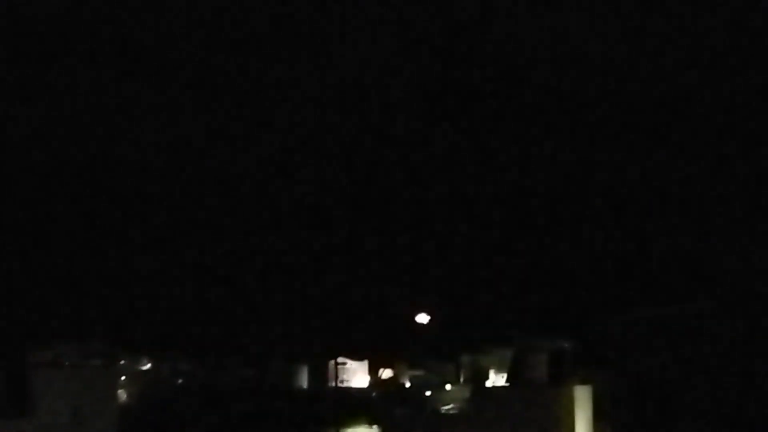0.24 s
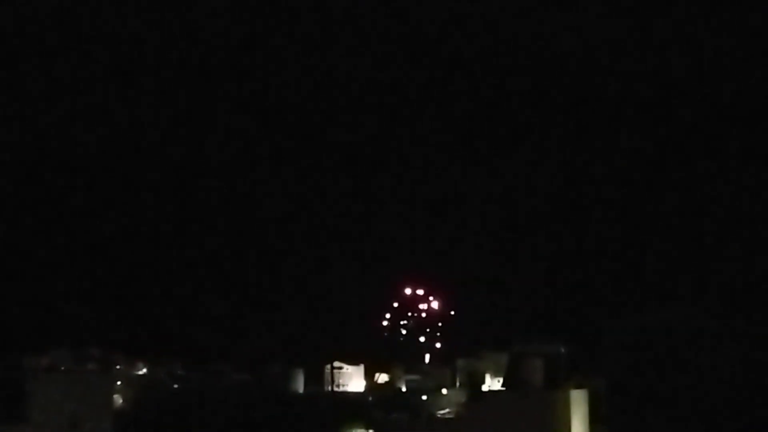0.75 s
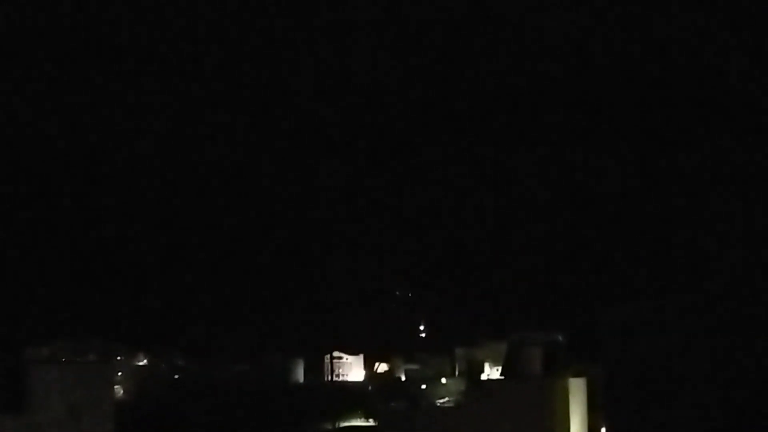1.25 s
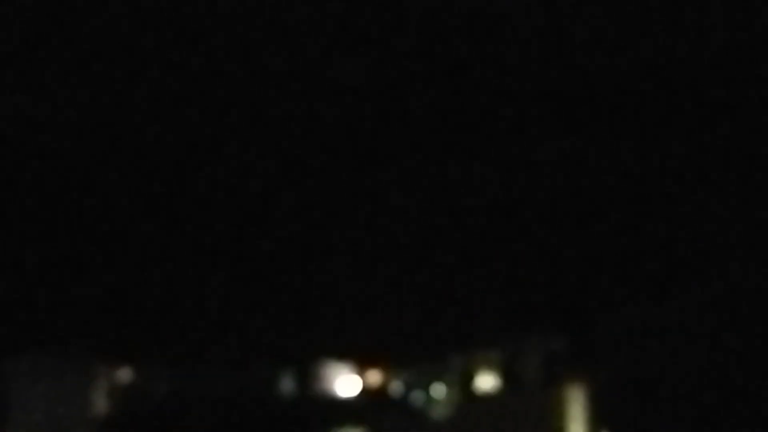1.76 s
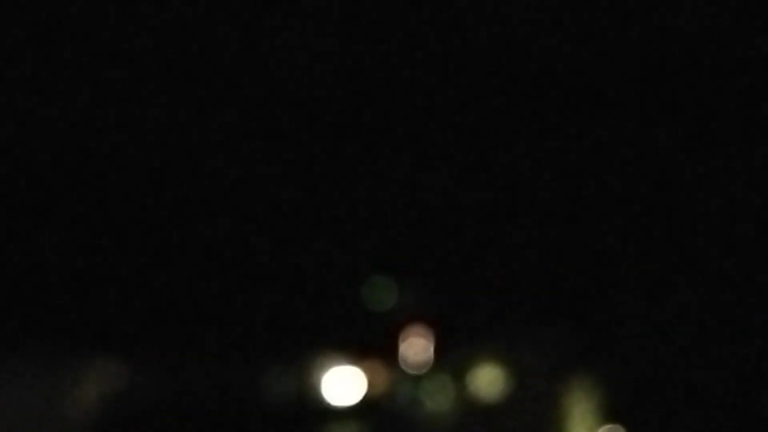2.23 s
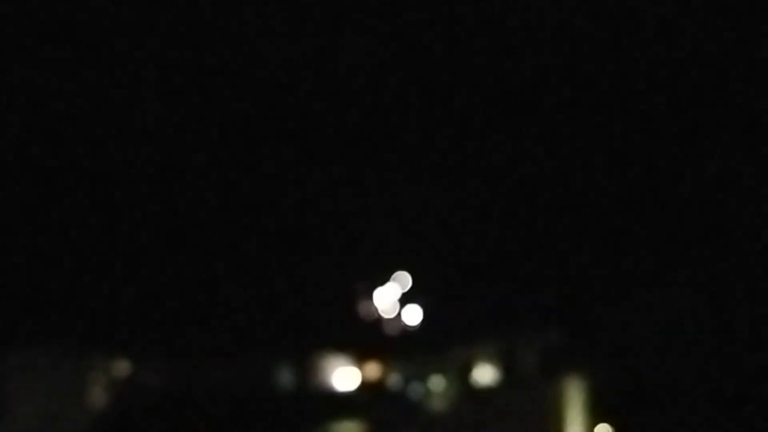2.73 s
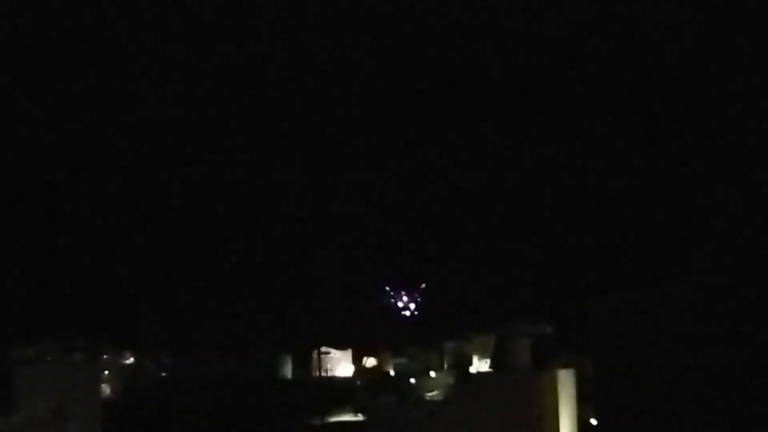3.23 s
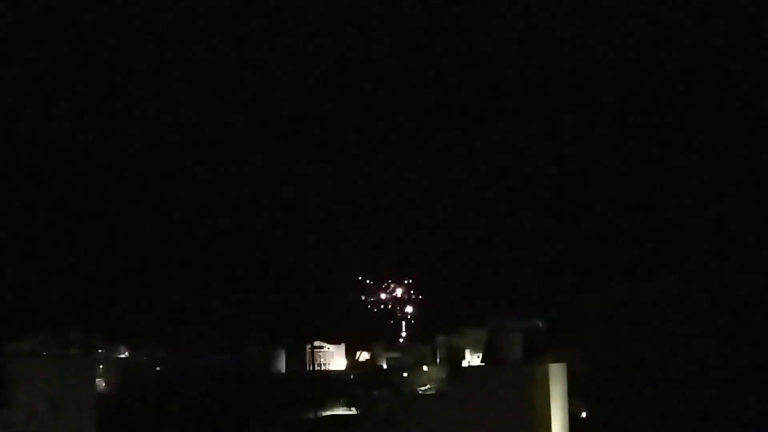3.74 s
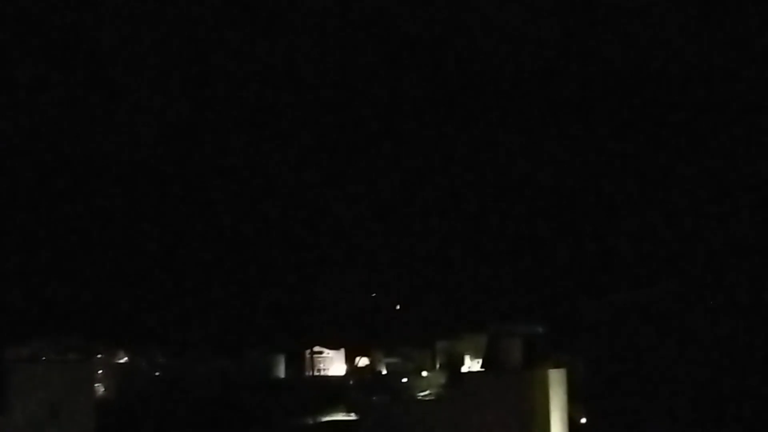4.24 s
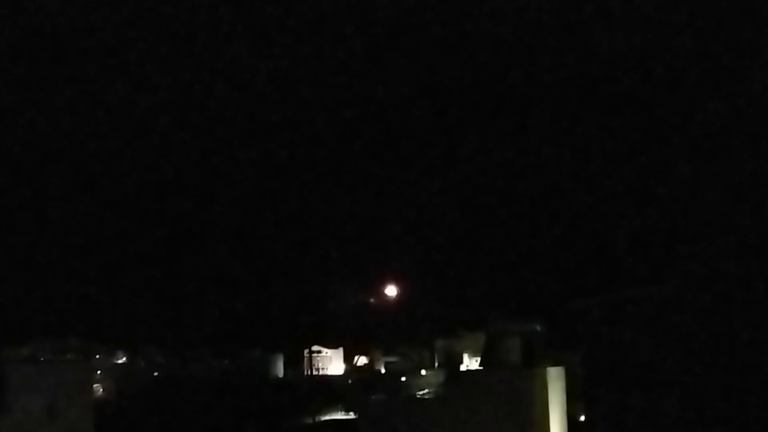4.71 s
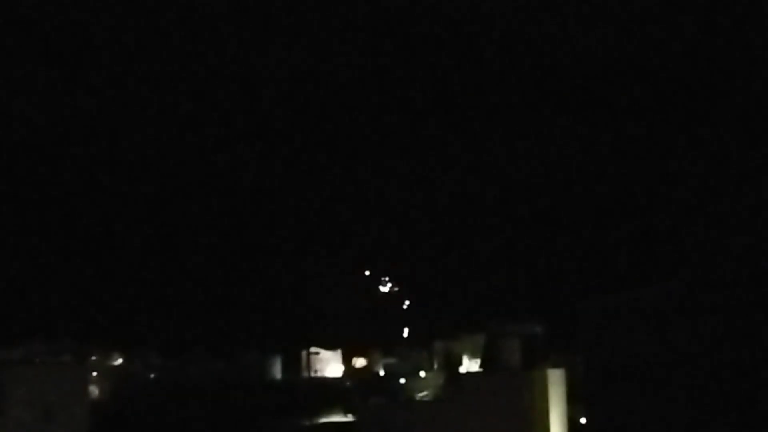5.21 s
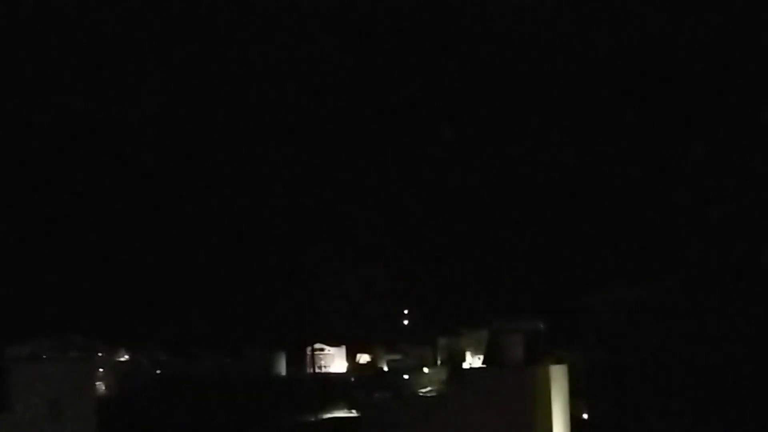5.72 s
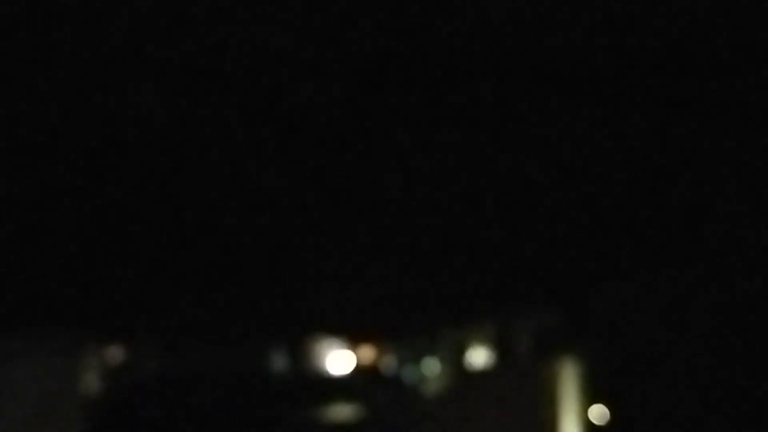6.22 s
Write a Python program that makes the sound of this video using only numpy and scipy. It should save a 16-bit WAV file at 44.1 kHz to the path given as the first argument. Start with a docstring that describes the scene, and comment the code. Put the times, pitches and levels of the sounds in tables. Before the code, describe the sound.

A town at night, heard in stereo from a distant balcony over a faint steady low background with slight hiss. From 0.15 to 1.4 s, small dry firework pops tick irregularly, a few sharper near 1.0 and 1.3 s, with very faint far thuds. At 1.7 s a hard bang cracks, slaps off close walls and rolls back from buildings with a brief falling bass whoop. Crackling stars thicken around 2.35-2.6 s, then thin out. A second bang at 3.3 s is followed by the loudest, densest crackle, 3.8-4.3 s. A duller, weaker bang at 4.4 s rumbles away; crisp crackles swell around 5.0-5.3 s, with stray snaps until 6.1 s. At 6.16 s the strongest bang hits, softly overloading the microphone, with close echoes, a short bright sizzle at 6.3 s and a rough rolling tail.

```python
"""Four firework shells burst over a town at night, heard in stereo from a distant balcony.
Each blast is a push, a suck and a rear shock; it slaps off near walls and rolls back from the buildings.
Stars pop singly as tiny N-shaped shocks, and three crackling swarms are random double clicks.
Filtered noise gives the far thuds, a bright sizzle and a steady background; falling sines give whoops."""
import sys
import numpy as np
from scipy import signal
from scipy.fft import rfft, irfft, next_fast_len
from scipy.io import wavfile
from scipy.ndimage import uniform_filter1d

SR = 44100
rng = np.random.default_rng(int(sys.argv[2]) if len(sys.argv) > 2 else 0)


def to_wav(s):
    """Save 16-bit WAV."""
    ch = np.atleast_2d(s).T  # columns
    pcm = np.round(np.clip(ch, -1, 1) * 32767)  # PCM
    wavfile.write(sys.argv[1], SR, pcm.astype(np.int16))


N = 284886
SIZE = next_fast_len(N + SR)
HZ = np.maximum(np.fft.rfftfreq(SIZE, 1 / SR), 1e-3)
TIME = np.arange(N) / SR

# Shell bursts: start_s, level_db, push_ms, rear_shock_lag_ms, rear_shock_strength, rounding_hz,
# front_snap_strength, splinter_db and roll_db (own levels), roll_tilt_db_per_octave
SHELLS = [(1.6754, 0.1, 0.46, 2.52, 0.39, 1570, 1.6, -21.5, -37.5, 1.5),
          (3.2688, -1.5, 0.86, 1.05, 0.22, 2670, 0.51, -17, -35, 0.2),
          (4.3838, -5.5, 1.7, 1.21, 1, 1710, 3.1, -19.5, -35, 0.2),
          (6.1578, 4, 0.33, 0.96, 0.21, 3130, 2.1, -37, -32.5, 0.7)]
# Strong echoes from large far facades: start_s, level_db, crack_db (relative to level_db)
FACADE_RETURNS = [(1.722, -40, -21), (1.784, -45, -23), (1.805, -59, -21), (1.83, -48, -21),
                  (1.914, -44, -6), (1.986, -43.5, -13), (2.051, -49.5, -5), (3.292, -32, -12),
                  (3.316, -46, 7), (3.392, -39, -3), (3.43, -47, -19), (3.469, -46.5, -18),
                  (3.493, -45, -18), (3.529, -43, -1), (3.587, -39.5, -27), (3.597, -50, -29),
                  (3.652, -46.5, -13), (4.407, -32.5, -13), (4.51, -34.5, -25), (4.529, -44, -23),
                  (4.547, -42, -20), (4.612, -43.5, -13), (4.645, -45.5, -7), (4.683, -38.5, -15),
                  (4.759, -43, -22), (4.812, -49.5, -9), (6.2, -53, -24), (6.263, -38, -14),
                  (6.28, -35.5, -6), (6.287, -56, -12), (6.32, -36, -30), (6.403, -42, -18),
                  (6.453, -39, -16)]
# Single star pops, loud and faint: start_s, level_db, shock_length_ms, rounding_hz
STAR_POPS = [(0.1502, -42.5, 0.62, 3500), (0.1707, -36.5, 0.58, 5300.0), (0.2601, -29, 0.46, 2040),
             (0.4278, -33, 0.11, 4100.0), (0.4642, -26, 0.11, 3600.0), (0.4886, -39, 0.23, 5350),
             (0.4952, -45, 0.27, 5000), (0.5533, -29, 0.11, 2700.0), (0.5625, -38, 0.27, 6100.0),
             (0.5903, -45, 0.2, 7000.0), (0.6463, -24, 0.17, 1400.0), (0.666, -30.5, 0.2, 6100.0),
             (0.71, -37, 0.21, 3600.0), (0.7158, -39, 0.4, 4000), (0.7218, -42, 0.38, 2700.0),
             (0.7257, -40, 0.25, 4000), (0.738, -37, 0.28, 3500), (0.754, -41, 0.25, 4000),
             (0.6755, -38, 0.35, 4000), (0.782, -38.5, 0.41, 3100.0), (0.832, -35, 0.32, 2700),
             (0.8517, -36, 0.44, 4700.0), (0.964, -38.5, 0.7, 5500), (0.992, -15.5, 0.11, 1800.0),
             (1.0156, -34, 0.33, 7000.0), (1.1588, -26, 0.15, 2700.0), (1.1873, -35.5, 0.38, 5300.0),
             (1.2875, -22.5, 0.19, 2850), (1.4262, -31, 0.14, 2100.0), (2.2179, -24, 0.13, 2700.0),
             (2.2827, -26, 0.23, 3600.0), (2.3145, -27.5, 0.35, 4100.0), (2.352, -9, 0.12, 2100.0),
             (2.3748, -19, 0.13, 1400.0), (2.418, -27, 0.34, 3600.0), (2.4214, -21, 0.27, 3000),
             (2.4332, -25.5, 0.4, 3200), (2.4472, -12, 0.15, 2380), (2.4539, -24, 0.36, 4500),
             (2.458, -17, 0.21, 2400.0), (2.4767, -36, 0.24, 4500), (2.4986, -30, 0.19, 4500),
             (2.5534, -31, 0.61, 4000), (2.5978, -23, 0.26, 4500), (2.5891, -43, 0.18, 6100.0),
             (2.606, -26, 0.3, 5340), (2.6365, -24.5, 0.31, 7000.0), (2.6542, -23.5, 0.19, 7000.0),
             (2.7884, -26.5, 0.67, 7000.0), (2.9152, -19.5, 0.15, 2520), (3.0981, -33, 0.26, 6100.0),
             (3.8076, -6.5, 0.069, 1610), (3.8656, -10, 0.099, 3100.0), (3.8859, -22, 0.42, 1400.0),
             (3.9045, -21.5, 0.45, 6900), (3.9258, -18.5, 0.36, 7000.0), (3.9429, -17.5, 0.55, 7000.0),
             (3.9518, -8, 0.13, 2400.0), (3.9766, -14.5, 0.19, 5250), (3.987, -17, 0.11, 4500),
             (3.9971, -19, 0.23, 4000), (4.0092, -19, 0.39, 4500), (4.021, -12, 0.18, 5300.0),
             (4.0295, -17.5, 0.31, 5000), (4.0438, -16.5, 0.29, 3600.0), (4.0516, -12, 0.2, 2400.0),
             (4.0568, -17.5, 0.16, 5000), (4.0734, -23, 0.31, 4500), (4.0901, -19, 0.23, 4500),
             (4.1009, -16.5, 0.22, 5300.0), (4.1087, -7.5, 0.17, 2100.0), (4.1401, -18.5, 0.37, 7000.0),
             (4.1742, -21, 0.28, 3960), (4.1807, -15.5, 0.23, 3600.0), (4.2224, -21.5, 0.41, 2720),
             (4.2279, -36, 0.47, 2700), (4.2336, -24.5, 0.33, 3000), (4.267, -19, 0.37, 3580),
             (4.3181, -26.5, 0.39, 4660), (4.9042, -39, 0.27, 4500), (4.9166, -31, 0.3, 4500),
             (4.9458, -18.5, 0.17, 2420), (4.9898, -23.5, 0.24, 4500), (5.0132, -25, 0.48, 4500),
             (5.0349, -9.5, 0.16, 2080), (5.08, -23, 0.3, 4000), (5.0922, -20, 0.33, 4000),
             (5.101, -8.5, 0.18, 2100.0), (5.1143, -23.5, 0.5, 7000.0), (5.1239, -26, 0.33, 3500),
             (5.1682, -6.5, 0.16, 2720), (5.1733, -11, 0.23, 6100.0), (5.1845, -21, 0.28, 4500),
             (5.1919, -26, 0.36, 4000), (5.216, -13.5, 0.25, 5300.0), (5.24, -9.5, 0.17, 2100.0),
             (5.2545, -16.5, 0.33, 2700.0), (5.2732, -19, 0.35, 2700.0), (5.4185, -23, 0.29, 6100.0),
             (5.4779, -31.5, 0.2, 6000), (5.5255, -36, 0.14, 5000), (5.5381, -35, 0.19, 5000),
             (5.5691, -30, 0.27, 5000), (5.5757, -11, 0.12, 2100.0), (5.5999, -19.5, 0.1, 3600.0),
             (5.6394, -10, 0.1, 1620), (5.731, -26, 0.63, 7000.0), (5.8392, -20.5, 0.11, 2400.0),
             (5.8611, -30.5, 0.2, 5340), (5.9569, -38, 0.56, 6960), (6.0617, -20, 0.17, 1800.0)]
# Dull far thuds: start_s, level_db
THUDS = [(0.147, -54), (0.261, -58.5), (1.604, -53)]
# Crackling swarms, thickest about 0.8 s after their bursts: thickest_s, relative_db, swell_s, thinning_s
SWARMS = [(2.499, -40.5, 0.12, 0.099), (4.032, -34.5, 0.11, 0.091), (5.169, -41.5, 0.14, 0.081)]
# Near walls: delay_ms, strength (before the band limits), lowest_hz, highest_hz
NEAR_WALLS = [(5.042, 0.76, 214, 2300), (12.19, 0.96, 210, 300), (15.15, 0.95, 15, 66),
              (25.39, 0.49, 380, 200)]
# Colours of the crackle, roll, splinters and background: frequency_hz, relative_db
CRACKLE_COLOUR = [(400, 2), (700, -1.5), (1000, -1.5), (1500, -1.5), (2300, -2), (3400, -1.5), (5200, -9),
                  (6600, -20), (8200, -34.5), (14000, -57)]
ROLL_COLOUR = [(40, -28.5), (90, -14.5), (150, -8.5), (250, -2.5), (420, 2), (650, -1), (950, -9),
               (1600, -13.5), (3000, -19.5), (5000, -27), (7500, -43), (14000, -59)]
SPLINTER_COLOUR = [(150, -37), (500, -23), (900, -2), (1600, 8), (3200, 3), (5000, -7.5), (7500, -24),
                   (14000, -46)]
BACKGROUND_COLOUR = [(15, -62), (25, -21.5), (91, -8.5), (250, -2.5), (326, -10), (392, -8), (511, -10),
                     (741, -13.5), (824, -9.5), (892, -15.5), (1920, -16.5), (5120, -25), (6850, -33.5),
                     (11000, -39), (14000, -30.5)]
# Diffuse sound at the two ears of the microphone: frequency_hz, likeness (0 unrelated, 1 alike)
LIKENESS = [(40, 0.089), (150, 0.73), (350, 0.87), (700, 0.16), (1500, 0.028), (3500, 0.043),
            (12000, 0.029)]
# The display lies a little to the left: frequency_hz, left_minus_right_db
LEFTWARD = [(200, 1), (600, 0.5), (1300, 3), (2500, 4.5), (8000, 5)]
# Long path through the air, dulling blasts, pops and sizzle: frequency_hz, relative_db
AIR_COLOUR = [(1000, 3), (3300, 5), (5200, 3), (6600, -3), (8200, -16), (10000, -12), (12000, -44),
              (15000, -71)]
# Standing waves between the balcony walls: frequency_hz, width_hz, boost_db
ALCOVE_MODES = [(186.7, 6.4, 5), (256.7, 53, 5.5), (430, 2.5, 3), (620, 86, 4)]


def from_db(db):
    """Amplitude for a level in dB."""
    return 10 ** (np.asarray(db) / 20)


def rms_one(x):
    """Scale to an RMS of 1."""
    return x / np.sqrt(np.mean(x ** 2) + 1e-20)


def at_hz(points):
    """Spread a short spectrum over all frequencies, along a log axis."""
    hz, value = np.transpose(points)
    return np.interp(np.log(HZ), np.log(hz), value)


def delay(ms):
    """Response of a pure delay."""
    return np.exp(-2j * np.pi * HZ * ms / 1000)


def low_pass(hz, order=1):
    """Response of a causal low-pass with one or two poles."""
    u = 1j * HZ / hz
    return 1 / (1 + u) if order == 1 else 1 / (1 + np.sqrt(2) * u + u * u)


def high_pass(hz, order=1):
    """Response of the matching high-pass."""
    return (1j * HZ / hz) ** order * low_pass(hz, order)


def colour(points):
    """Causal (minimum-phase) response with the given spectrum and unit power."""
    magnitude = rms_one(from_db(at_hz(points)))
    cepstrum = irfft(np.log(magnitude), SIZE)
    cepstrum[1:SIZE // 2] *= 2
    cepstrum[SIZE // 2 + 1:] = 0
    return np.exp(rfft(cepstrum))


def filtered(x, response):
    """Pass a signal through a frequency response."""
    return irfft(rfft(x, SIZE) * response, SIZE)[..., :N]


def drift(knots_per_s):
    """Random wandering of RMS 1, straight between its knots."""
    knots = rng.standard_normal(4000)
    return rms_one(np.interp(TIME * knots_per_s, np.arange(len(knots)), knots))


def dying(start_s, t60_s, rise_s=0.0015):
    """Envelope that swells at its start and dies away by 60 dB in t60_s."""
    age = np.maximum(TIME - start_s, 0)
    return (1 - np.exp(-age / rise_s)) * from_db(np.maximum(-60 * age / t60_s, -200))


def bell(centre_s, before_s, after_s):
    """Bell-shaped rise and fall, with its own width on each side."""
    width = np.where(TIME < centre_s, before_s, after_s)
    return np.exp(-.5 * ((TIME - centre_s) / width) ** 2)


def diffuse(envelope, response):
    """A crowd of arrivals from all sides, as noise whose two channels are alike by frequency."""
    mid, side = rfft(rng.standard_normal((2, N)) * envelope, SIZE)
    alike = np.clip(at_hz(LIKENESS), -1, 1)
    both = np.sqrt((1 + alike) / 2) * mid + np.sqrt((1 - alike) / 2) * side * [[1], [-1]]
    return irfft(both * response, SIZE)[:, :N]


def air():
    """Response of the long way through the air, 1 in the bass."""
    response = colour(AIR_COLOUR)
    return response / abs(response[0])


def alcove():
    """Response of the standing waves around the listener: a resonant boost for each mode."""
    modes = [1 + (from_db(db) - 1) / (1 + 1j * (HZ / hz - hz / HZ) * hz / width)
             for hz, width, db in ALCOVE_MODES]
    return np.prod(modes, axis=0)


def background(level_db=-63):
    """Steady background noise, as coloured diffuse noise."""
    return diffuse(from_db(level_db), colour(BACKGROUND_COLOUR))


def rooftops(stars, level_db=-11, t60_s=2.0):
    """The roofs return a faint wash of the stars, convolved with dying diffuse noise."""
    fade = dying(0.0028, t60_s, rise_s=0.0024)
    wash = diffuse(fade / np.linalg.norm(fade), low_pass(8000))
    return filtered(stars, from_db(level_db) * rfft(wash, SIZE))


def roll(t60_s=1.99, far_t60_s=13.8, far_db=-18, thud_t60_s=0.28, thud_tilt_db=-2.5):
    """The town answers each burst with a lumpy, dull cloud of echoes; the far ones linger. Thuds join in."""
    clouds = []
    for start, *_, db, tilt_db in SHELLS:
        near = dying(start, t60_s, rise_s=0.00086)
        far = from_db(far_db) * dying(start, far_t60_s, rise_s=0.47)
        clouds.append((from_db(db) * np.hypot(near, far), tilt_db))
    thuds = sum(from_db(db) * dying(start, thud_t60_s, rise_s=0.0018) for start, db in THUDS)
    clouds.append((thuds, thud_tilt_db))
    # single walls and whole blocks return unequal shares
    facades = rms_one(from_db(2.0 * drift(400) + 1.0 * drift(40)))
    octaves = np.log2(np.clip(HZ, 200, 800) / 400)
    dull = colour(ROLL_COLOUR) * alcove()
    return sum(diffuse(envelope * facades, dull * from_db(tilt_db * octaves))
               for envelope, tilt_db in clouds)


def whoops(late_s=0.115, centre_hz=152, fall_octaves_per_s=15, below_roll_db=-6.5,
           swell_s=0.03, fade_s=0.018):
    """A row of houses echoes at ever wider intervals, merged here into a short, falling bass sine."""
    out = 0
    for start, *_, roll_db, _ in SHELLS:
        centre = start + late_s
        octaves = np.clip(-fall_octaves_per_s * (TIME - centre), -2, 2)
        tone = np.sin(2 * np.pi * np.cumsum(centre_hz * 2 ** octaves) / SR)
        out = out + from_db(roll_db + below_roll_db) * bell(centre, swell_s, fade_s) * tone
    return out


def sizzle(start_s=6.319, level_db=-35, t60_s=.18, low_hz=3000, high_hz=4200):
    """A brief bright hiss in the last echo, as dying band-limited noise."""
    band = high_pass(low_hz, order=2) * low_pass(high_hz, order=2)
    return diffuse(from_db(level_db) * dying(start_s, t60_s), band * air())


def swarm_level(late_s=0.35, stragglers_db=-15.5, spread_s=0.13):
    """Each swarm swells and thins as burn times scatter; slow-burning stragglers follow."""
    power = 0
    for thickest, db, swell, thinning in SWARMS:
        swarm = from_db(db) ** 2 * bell(thickest, swell, thinning)
        stragglers = from_db(db + stragglers_db) ** 2 * bell(thickest + late_s, spread_s, spread_s)
        power = power + swarm + stragglers
    return np.sqrt(power)


def crackle(trim_db=-4.0, per_s=700, crowding=0.4, flurry_db=0.5, star_spread_db=5.0, low_hz=520):
    """Stars go off at random in slight flurries, each a front and a rear jump; louder swarms are denser."""
    level = swarm_level() * from_db(flurry_db * drift(60))
    rate = per_s * (level / from_db(-40)) ** crowding  # per_s holds at a swarm level of -40 dB
    born = rng.random(N) < rate / SR
    clicks = born * from_db(star_spread_db * np.clip(rng.standard_normal(N), -2, 1.5))
    lengths = rng.integers(6, 36, N)  # samples from front to rear
    shocks = clicks.copy()
    at = np.flatnonzero(clicks)
    np.add.at(shocks, np.minimum(at + lengths[at], N - 1), clicks[at])
    # even out the running power, so that the swarm level sets the loudness
    power = uniform_filter1d(shocks ** 2, size=1800)
    even = shocks / np.sqrt(np.maximum(power, 1e-5))
    return filtered(even * level * from_db(trim_db), colour(CRACKLE_COLOUR) * high_pass(low_hz, order=2))


def pops(low_hz=700, size=256, copies=7, split_ms=.8, split_share=.2):
    """Single stars burst as N-shaped shocks; uneven air frays each one with weak late copies."""
    out, k = np.zeros(N), np.arange(size + 1)
    chances = rng.random((len(STAR_POPS), 2, copies))
    for (start, db, length_ms, round_hz), (lag_chance, share_chance) in zip(STAR_POPS, chances):
        length = length_ms * SR / 1000
        wave = np.diff(np.maximum(k * (1 - k / length), 0))  # slope of an arch: an N
        wave = signal.lfilter(*signal.butter(2, round_hz, fs=SR), wave)
        paths = np.zeros(size)
        paths[0] = 1
        spread = -np.log(1 - lag_chance) * split_ms * SR / 1000  # exponential, mean split_ms
        lags = 4 + np.minimum(spread, size // 2).astype(int)
        paths[lags] = 2 * split_share * (2 * share_chance - 1)  # either sign, mean size split_share
        split = np.convolve(wave, paths)[:size]
        split *= np.linalg.norm(wave) / np.linalg.norm(split)  # fraying keeps the energy
        at = int(start * SR)
        out[at:at + size] += from_db(db) * split
    return filtered(out, high_pass(low_hz) * air())


def returns(t60_s=0.25, smear_db=-5.5, front_db=23):
    """Strong echoes from large facades, each a dull filtered click with a short noisy smear."""
    body, crack = np.zeros((2, N))
    rough = from_db(smear_db) * rng.standard_normal(N)
    for start, db, crack_db in FACADE_RETURNS:
        echo = rough * dying(start, t60_s, rise_s=0.0007)
        echo[int(start * SR)] += from_db(front_db)
        body += from_db(db) * echo
        crack += from_db(db + crack_db) * echo
    dulled = from_db(-5) * colour(SPLINTER_COLOUR) * low_pass(1900, order=2)
    return filtered(body, colour(ROLL_COLOUR)) + filtered(crack, dulled)


def splinters(t60_s=0.034):
    """Uneven air splits each front into a few milliseconds of ragged crack, as dying noise."""
    envelope = sum(from_db(db) * dying(start, t60_s, rise_s=0.000067)
                   for start, *_, db, roll_db, tilt_db in SHELLS)
    return filtered(rng.standard_normal(N) * envelope, colour(SPLINTER_COLOUR))


def blasts(bass_hz=150, sub_hz=75, snap_low_hz=1200, snap_high_hz=2300):
    """Each burst is a steep push and a longer suck, closed by a rear shock; the air rounds the front."""
    out = 0
    for start, db, push_ms, lag_ms, rear, round_hz, snap, *_ in SHELLS:
        corner = 1000 / (2 * np.pi * push_ms)
        wave = SR * push_ms / 1000 * high_pass(corner) * low_pass(corner)  # push, then suck
        body = wave * low_pass(round_hz, order=2) * (1 - rear * delay(lag_ms))
        front = snap * high_pass(snap_low_hz) * low_pass(snap_high_hz)
        out = out + from_db(db) * (body + front) * delay(1000 * start)
    return irfft(out * air() * high_pass(bass_hz, order=2) * high_pass(sub_hz), SIZE)[:N]


def balcony(x, scatter_t60_s=.085, scatter_db=-6, scatter_low_hz=800, left_lag_ms=.022):
    """Direct sound, slaps off the near walls and a short scatter off railings and corners."""
    slaps = sum(strength * delay(ms) * high_pass(low) * low_pass(high)
                for ms, strength, low, high in NEAR_WALLS)
    fade = dying(0.0001, scatter_t60_s)
    scatter = diffuse(fade / np.linalg.norm(fade), high_pass(scatter_low_hz, order=2))
    lag = np.array([delay(left_lag_ms), delay(0)])
    ears = from_db(at_hz(LEFTWARD) * [[.5], [-.5]]) * lag
    return filtered(x, ears * alcove() * (1 + slaps + from_db(scatter_db) * rfft(scatter, SIZE)))


def scene():
    """Bangs, stars and facade echoes pass through the balcony; roll, whoops, sizzle and background join."""
    stars = pops() + crackle()
    near = balcony(blasts() + splinters() + returns() + stars)
    return near + rooftops(stars) + roll() + whoops() + sizzle() + background()


def record(dry, ceiling=.93, cutoff_hz=15800):
    """The microphone overloads softly, flattening peaks towards the ceiling; the top is cut steeply."""
    held = dry / (1 + (dry / ceiling) ** 8) ** (1 / 8)
    return signal.sosfilt(signal.ellip(10, .1, 80, cutoff_hz, fs=SR, output="sos"), held)


dry = scene()
out = record(dry)
to_wav(out)
```